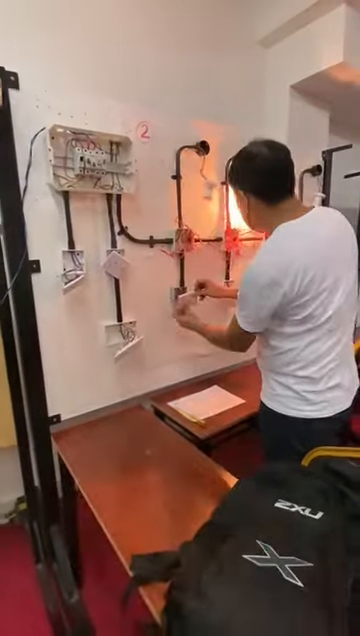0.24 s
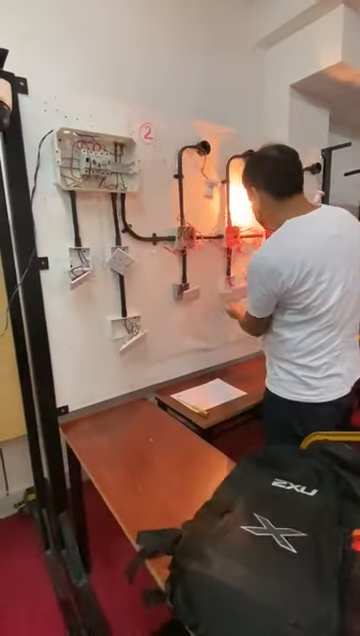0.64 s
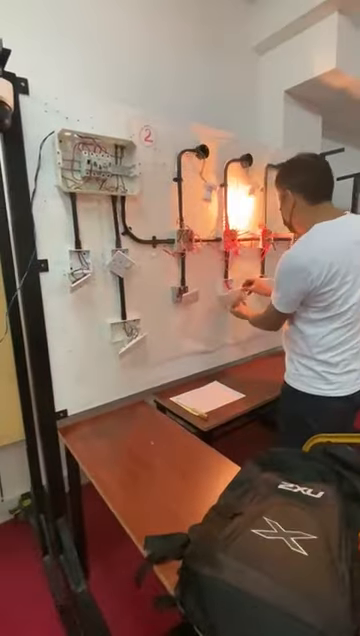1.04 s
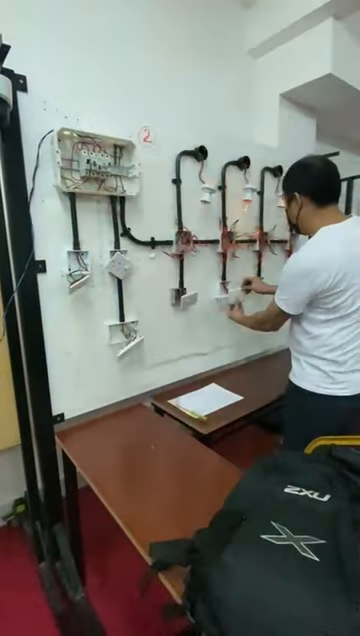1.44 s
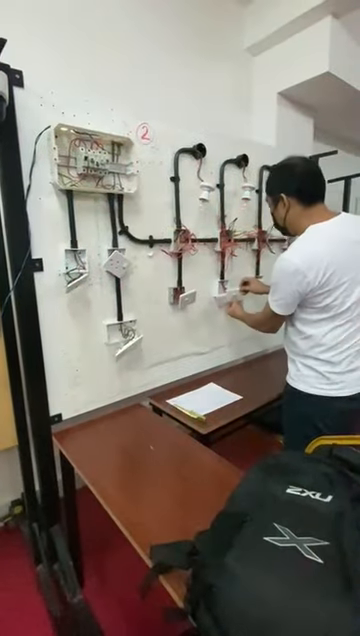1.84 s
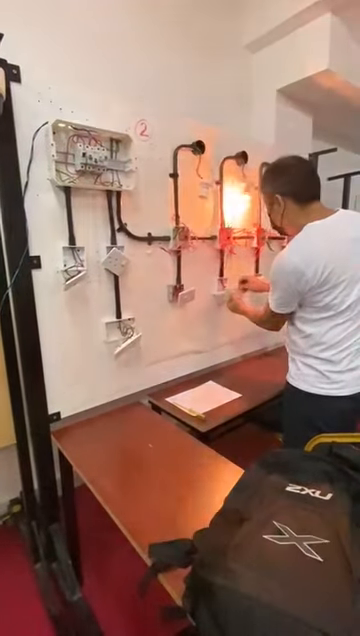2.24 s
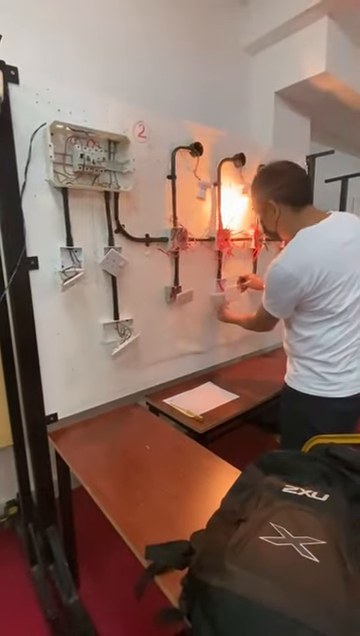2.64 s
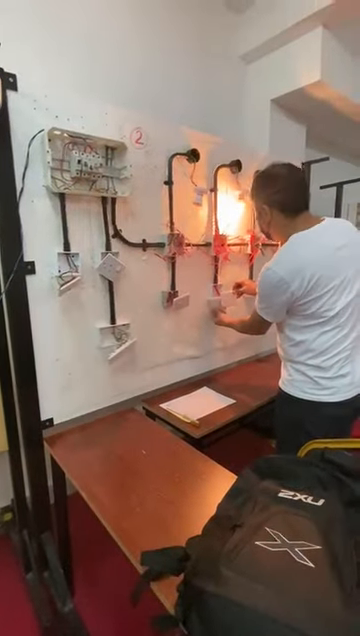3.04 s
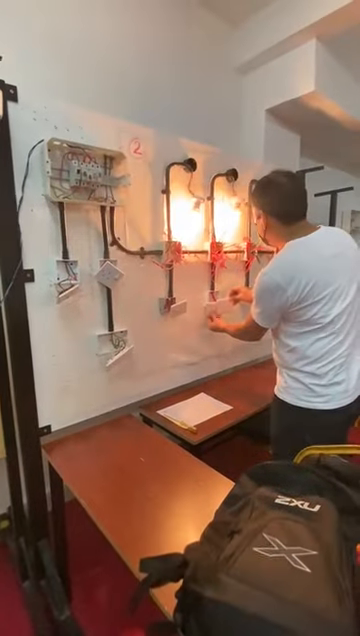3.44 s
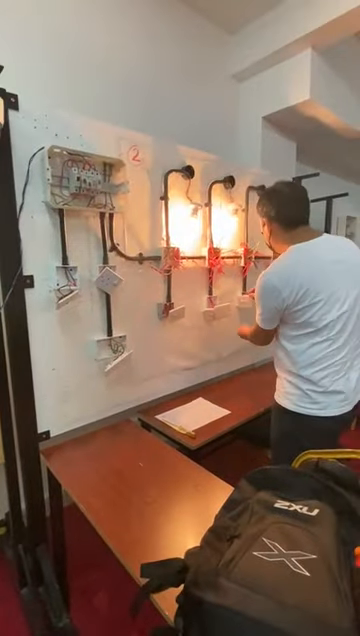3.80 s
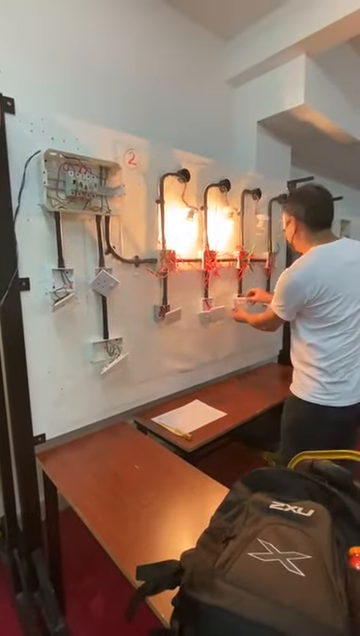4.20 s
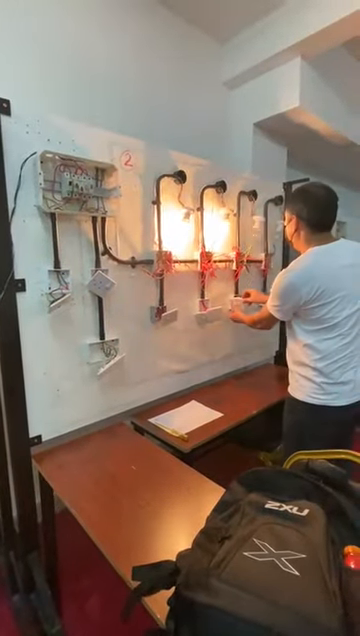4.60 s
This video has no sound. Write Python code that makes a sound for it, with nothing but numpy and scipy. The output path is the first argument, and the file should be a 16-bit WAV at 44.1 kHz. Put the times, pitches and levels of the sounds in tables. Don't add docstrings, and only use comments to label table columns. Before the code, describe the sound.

Four sharp plastic light-switch snaps ring out about a second apart in a hard, echoing room over low ventilation rumble.

```python
import sys
import numpy as np
from scipy import signal
from scipy.fft import rfft, irfft
from scipy.io import wavfile
from scipy.ndimage import uniform_filter1d

SR = 44100
rng = np.random.default_rng(int(sys.argv[2]) if len(sys.argv) > 2 else 0)


def materialize(psi):
    bounded = np.clip(np.atleast_2d(psi).T, -1, 1)
    quanta = np.round(bounded * 32767).astype(np.int16)
    wavfile.write(sys.argv[1], SR, quanta)


def undo_db(level):
    steps = np.asarray(level, float) / 20
    return 10 ** steps


N = 209817

# start in seconds, peak in dB, room tail in dB rms, chatter length in ms,
# level in dB of the creak before the snap.
SNAPS = [
    (.0003, -6.5, -41, .9, -60),
    (1.2964, -7, -33.5, 1, -17.5),
    (2.2294, -5, -34, 1.0, -27.5),
    (3.1643, -7.5, -39, .85, -36),
]
# pitch in Hz, width in Hz, level in dB.
ROCKERS = [
    [(2820, 600, -11), (5140, 600, -2), (5600, 330, -2.5), (6450, 300, -1.5), (6800, 740, -6.5),
     (9200, 1200, -12.5)],
    [(2780, 270, -5), (5160, 310, -8.5), (5740, 92, -7.5), (6100, 120, -8.5), (8820, 1400, -17.5),
     (10700, 160, -26.5)],
    [(2940, 160, -4.5), (4110, 250, -9), (4850, 660, -14.5), (5860, 120, -6), (6950, 180, -15.5),
     (9420, 270, -17)],
    [(2900, 540, -17), (4530, 130, -13), (5453, 230, -5.5), (6500, 810, -17.5), (8030, 130, -15),
     (9000, 380, -19)],
]
# frequency in Hz, level in dB per Hz.
TAILS = [
    [(710, -37.5), (1200, -14), (2550, -11), (2830, 0), (3080, -5.5), (4840, -9.5), (5730, -4),
     (6600, -3.5), (8190, -17), (10300, -10.5), (11000, -21), (11400, -60.5), (14800, -92.5), (22000, -120)],
    [(710, -45.5), (1200, -21.5), (2150, -17), (2910, 4), (3350, -3), (3710, -26), (4040, -7.5),
     (4660, -10), (5310, -7.5), (7890, -14.5), (8920, -12), (11400, -56.5), (14800, -88.5), (22000, -120)],
    [(710, -30.5), (1200, -9.5), (1900, -24.5), (2200, -7.5), (2700, 1.5), (3140, 3.5), (4480, -8.5),
     (5310, -3.5), (6850, -7.5), (9350, -14), (11100, -31.5), (11400, -87.5), (14800, -113), (22000, -120)],
    [(710, -40.5), (1200, -22), (1490, -25.5), (1850, -12.5), (2830, -5), (3850, -12.5), (4450, 2.5),
     (4790, -2), (5360, -2.5), (9090, -16.5), (10500, -17), (11400, -36.5), (14800, -81), (22000, -120)],
]
# delay in ms, level in dB.
ECHOES = [(1.4, -5), (3.9, -14), (5.6, -12), (7.6, -17), (9.5, -13.5), (12.3, -18.5)]
# frequency in Hz, left over right in dB.
PORTS = [(200, 4.5), (1000, -3), (2000, 0.5), (2700, -14.5), (3200, -20.5), (3600, -3), (4400, -8.5),
         (5200, -6.5), (6200, -8), (7500, -9.5), (8300, 1.5), (11000, 1.5)]
# frequency in Hz, how far the left port is turned ahead of the right one, in radians.
PORT_TURN = [(200, 0), (2000, .8), (3000, 1.5), (4600, 2.4), (5100, 0), (7000, .5), (8000, 1.6),
             (11000, 2.8)]


def snap(mix, row, modes, colour):
    s, db, room_db, chatter_ms, creak_db = row
    lead = 600
    ms = (np.arange(lead + 200) - lead) * 1000 / SR
    chatter = np.exp(-(np.maximum(ms, 0) / chatter_ms) ** 2) * (ms >= 0)
    creak = undo_db(creak_db) * np.exp(np.minimum(ms, 0) / 6.0) * (ms < 0)
    x = np.convolve(rough(chatter + creak), ring(modes, rise_ms=0.011))
    x = signal.sosfilt(signal.butter(3, 1700, "high", fs=SR, output="sos"), x)
    x = undo_db(db) * x / abs(x).max()

    hz = np.fft.rfftfreq(len(x), 1 / SR)
    lean, turn = read(PORTS, hz) / 2, read(PORT_TURN, hz) / 2
    level = undo_db(np.array([lean, -lean]))
    phase = np.exp(1j * np.array([turn, -turn]))
    near = np.zeros((2, len(x) + 800))
    add(near, 0, irfft(rfft(x) * level * phase, len(x)))

    near_db = -4.5
    jitter = rng.uniform(-0.81, 1, (len(ECHOES), 2))
    for (delay_ms, echo_db), (shift, side) in zip(ECHOES, jitter):
        sides = undo_db(3.1 * side * np.array([[1], [-1]]))
        add(near, (delay_ms + 0.29 * shift) / 1000, undo_db(echo_db + near_db) * x * sides)
    add(mix, s - lead / SR, near[:, max(lead - round(s * SR), 0):])
    add(mix, s, undo_db(room_db) * room(colour))


# start in seconds, peak in dB, ring in Hz, brightness in dB, room in dB.
TICKS = [(0.8889, -48, 2940, -5.5, 2), (0.9342, -42.5, 2900, -5.5, 13.5), (1.8305, -38, 3100, -11, 12.5),
         (1.8681, -53, 6670, -7.5, 2), (2.1766, -60, 2280, -13, 27.5), (2.4783, -37, 3090, 1, -7.5),
         (2.6879, -65.5, 2800, 0.5, -9.5), (2.7925, -50, 4530, -18.5, -3), (3.0966, -43.5, 2700, -7, 5.5),
         (3.2431, -35.5, 5400, 9, 12), (3.655, -58, 7000, -6, 9), (4.2368, -63.5, 4110, -4, -23),
         (4.5553, -55.5, 2080, -17.5, 11.5), (4.7197, -62, 2060, -25.5, 5)]


def tick(row, tail):
    s, db, hz, bright_db, room_db = row
    scratch = rough(np.exp(-np.arange(500) / 150.0))
    modes = [(hz, 600, 0), (1300, 500, -8), (5400, 700, bright_db), (8000, 3000, bright_db - 20.5)]
    x = np.convolve(scratch, ring(modes, rise_ms=0.05, size=600))
    plate_lean_db = -13.5
    return s, heard(undo_db(db + 1.0) * x / abs(x).max(), plate_lean_db, room_db, tail)


# start in seconds, peak in dB, upper ring in dB,
# left over right in dB, room in dB.
KNOCKS = [
    [(0.593, -35, -14, 11, 6.5), (0.704, -47.5, -12.5, 1, -2), (3.914, -64, -7, 0, 16),
     (3.957, -46.5, -5.5, 18, 12)],
    [(0.895, -46.5, -16, 5.5, -23), (1.867, -49, -24, 7, 16.5), (1.899, -72, -17, 13, -22.5),
     (2.463, -58, 3, 7, -7.5)],
    [(3.265, -38, -2, 1, 7), (3.534, -42.5, -12, -0.5, 17.5), (3.559, -40.5, 5, -5, 2.5),
     (4.25, -51, -5, 4, -7)],
]
# ring in Hz, upper ring in Hz.
BODIES = [
    (332, 700),
    (185, 1000),
    (189, 870),
]


def knock(row, tail):
    s, db, upper_db, lean_db, room_db, hz, upper_hz = row
    push = np.hanning(30)
    low = [(hz, 110, 0), (1.6 * hz, 160, -4)]
    upper = [(upper_hz, 130, upper_db), (1.4 * upper_hz, 300, upper_db - 3.0)]
    x = np.convolve(push, ring(low + upper, rise_ms=0.91, size=3000))
    return s, heard(undo_db(db + 3.5) * x / abs(x).max(), lean_db, room_db, tail)


# peak in seconds, level in dB, rise and fall in seconds.
SLIDE = [
    (0.91, -61, 0.01, 0.12),
    (.96, -62.5, 0.058, 0.4),
    (1.875, -57.5, .02, 0.24),
    (2.218, -55, .22, .006),
    (3.094, -58.5, 0.015, .07),
    (3.16, -45.5, 0.0026, 0.0023),
]
# frequency in Hz, level in dB per Hz.
PALM = [(290, -33), (500, -7.5), (1050, -4.5), (1440, -32.5), (3040, -8), (4000, -35.5), (5480, -29),
        (7490, -59), (9120, -26), (11400, -76), (14800, -104), (22000, -120)]
# peak in seconds, level in dB, rise and fall in seconds.
RUSTLE = [
    (.9, -56, 0.03, 0.092),
    (.95, -61, 0.029, 0.29),
    (3.6, -65.5, 0.0042, 0.46),
    (3.93, -62, 0.043, 0.49),
    (4.25, -50, 0.083, 0.37),
    (4.56, -69.5, 0.056, 0.06),
]
# frequency in Hz, level in dB per Hz.
CLOTH = [(290, -48), (500, 1.5), (658, -6.5), (1410, -6.5), (1580, -14.5), (2190, -6), (4440, -9),
         (7020, -12.5), (9240, -17), (11400, -55.5), (14800, -88), (22000, -120)]


def rustle(strokes, colour, gain_db):
    t = np.arange(N) / SR
    level = np.zeros(N)
    for s, db, rise, fall in strokes:
        swell = np.interp(t, [s - abs(rise), s, s + abs(fall)], [0, 1, 0])
        level += undo_db(db) * swell ** 2.08
    grain = undo_db(2.0 * evened(uniform_filter1d(rng.standard_normal(N), 300)))
    hiss = pair(N, 256, lambda hz, t: read(colour, hz) + 0 * t)
    return undo_db(gain_db) * hiss * evened(grain) * uniform_filter1d(level, 400)


# start in seconds, pitch in Hz, level in dB, time to fall 60 dB in seconds.
CONDUIT = [
    (0.886, 1130, -54, 0.42),
    (0.938, 1143, -56.5, 0.32),
    (.975, 1138, -63, 0.37),
    (1.83, 5200, -58.5, 0.404),
    (3.564, 824, -44, 0.38),
]


def conduit(mix):
    t = np.arange(SR // 2) / SR
    for s, hz, db, t60 in CONDUIT:
        flutter = 1 + .5 * evened(uniform_filter1d(rng.standard_normal((len(t), 2)).T, size=500))
        fade = undo_db(db - 60 * t / t60) * (1 - np.exp(-t / 0.0022))
        note = np.sin(2 * np.pi * hz * t + np.array([[0], [1.8]]))
        add(mix, s, fade * note * flutter)


# frequency in Hz, level in dB per Hz.
AIR = [(12, -36), (20, -14.5), (48, -1), (101, -3.5), (212, -7), (236, -11), (300, -11), (352, -11),
       (435, -11), (510, -20.5), (552, -18.5), (1070, -24.5), (1640, -33.5), (6520, -49.5), (11400, -74.5),
       (14800, -101), (22000, -120)]
# time in seconds, level in dB.
RUMBLE = [(0.0, -52), (0.33, -56.5), (0.52, -51.5), (1.539, -53.5), (1.849, -54.5), (2.33, -49),
          (3.048, -57), (3.36, -56), (3.7, -48), (3.84, -52), (4.53, -53.5), (4.76, -52.5)]


def air():
    s, db = np.transpose(RUMBLE)

    def wander(hz, t):
        rumble = (np.interp(t, s, db) - db.mean()) / (1 + (hz / 600) ** 2)
        blotches = 7.0 * patches(hz, t) * hz / (hz + 800)
        return read(AIR, hz) + rumble + blotches

    return undo_db(-49.5) * pair(N, 2048, wander)


def patches(hz, t):
    x = uniform_filter1d(rng.standard_normal((len(t), len(hz))), size=8, axis=0)
    return evened(uniform_filter1d(x, size=20, axis=1)).T


# pitch in Hz, width in Hz, level in dB rms.
FAN = [
    (45, 14, -54.5),
    (209.4, 20, -70.5),
    (279.8, 7.2, -64.5),
]


def fan():
    def humps(hz, t):
        power = sum(undo_db(2 * db) / width / (1 + (2 * (hz - f) / width) ** 4) for f, width, db in FAN)
        return 10 * np.log10(power) + 0 * t

    total = np.linalg.norm(undo_db(np.transpose(FAN)[2]))
    return total * pair(N, 16384, humps)


# pitch in Hz, peak level in dB before wavering.
WHINE = [
    (9020, -92),
    (6000, -91),
]


def whine():
    waver_db, waver_s = 3.5, .12
    t, span = np.arange(N) / SR, round(waver_s * SR)
    drift = uniform_filter1d(rng.standard_normal((len(WHINE), N)), span)
    waver = evened(uniform_filter1d(drift, span))
    tones = sum(undo_db(db + waver_db * w) * np.sin(2 * np.pi * hz * t) for (hz, db), w in zip(WHINE, waver))
    return tones * undo_db(np.array([[1.5], [-1.5]]))


def rough(shape):
    x = rng.standard_normal(len(shape)) * shape
    for _ in range(4):
        z = rfft(x, 2048)
        x = irfft(z / (abs(z) + 1e-9), 2048)[:len(shape)]
        x = x * shape / np.sqrt(uniform_filter1d(x ** 2, size=24) + 1e-14)
    return x


def ring(modes, rise_ms, size=2000):
    t = np.arange(size) / SR
    x = np.zeros(size)
    for (hz, width, db), phase in zip(modes, rng.random(8)):
        decay = np.exp(-np.pi * width * t)
        x += undo_db(db) * width * decay * np.sin(2 * np.pi * (hz * t + phase))
    x = x * (1 - np.exp(-t * 1000 / rise_ms)) ** 2
    return x / abs(x).max()


def heard(x, lean_db, room_db, tail):
    wet = undo_db(room_db) * signal.fftconvolve(x[None], tail / np.linalg.norm(tail[0]), axes=1)
    add(wet, 0, x * undo_db(np.array([[lean_db / 2], [-lean_db / 2]])))
    return wet


# frequency in Hz, time to fall 60 dB in seconds.
ROOM_T60 = [(200, 1), (1000, 0.64), (2500, 1.026), (4000, 1.026), (6000, 0.84), (9000, 0.62)]


def room(colour, start_ms=0.9, build_ms=2.0):
    def dying(hz, t):
        return read(colour, hz) - 60 * (t - .09) / np.maximum(read(ROOM_T60, hz), .1)

    ms = np.arange(60000) * 1000 / SR
    tail = pair(60000, 256, dying) * (1 - np.exp(-np.maximum(ms - start_ms, 0) / build_ms))
    return tail / np.sqrt(np.mean(tail[:, :SR // 5] ** 2))


# frequency in Hz, likeness (negative = opposite sign).
DIFFUSE_SAME = [(60, .96), (200, .93), (500, .1), (1100, -.5), (1800, 0), (2900, -.45), (3500, -.4),
                (4000, -.05), (4650, -.55), (5300, .5), (6300, .4), (7300, .75), (8100, .05), (10800, -.8)]
# frequency in Hz, left over right in dB.
DIFFUSE_LEAN = [(60, 2.5), (400, 4.5), (1000, 1), (3000, -1.5), (5500, -1.5), (7000, 0), (9000, 1.5),
                (11000, 0)]


def pair(length, size, shape):
    hop, hz = size // 4, np.fft.rfftfreq(size, 1 / SR)[:, None]
    t = np.arange(length // hop + 5) * hop / SR
    a, b, c, d = rng.standard_normal((len(t), len(hz), 4)).T
    like, lean = read(DIFFUSE_SAME, hz), read(DIFFUSE_LEAN, hz)
    left = a + 1j * b
    right = like * left + np.sqrt(1 - like ** 2) * (c + 1j * d)
    z = np.array([left * undo_db(lean / 2), right * undo_db(-lean / 2)]) * undo_db(shape(hz, t))
    return evened(signal.istft(z, nperseg=size, noverlap=size - hop)[1][:, :length])


def evened(x):
    return x / np.sqrt(np.mean(x ** 2) + 1e-20)


def read(points, hz):
    f, value = np.transpose(points)
    return np.interp(np.log(hz + 1), np.log(f + 1), value)


def add(mix, s, sound):
    part = mix[:, max(round(s * SR), 0):][:, :sound.shape[1]]
    part += sound[:, :part.shape[1]]


# frequency in Hz, level in dB.
ROOM_COLOUR = [(300, 10.5), (1500, 13.5), (2300, 5), (3000, 3), (4300, 4.5), (6000, -24), (8000, -17.5),
               (11000, 14)]


def scene():
    mix = air() + fan() + rustle(RUSTLE, CLOTH, gain_db=0.5) + rustle(SLIDE, PALM, gain_db=6.0)
    conduit(mix)
    for row, modes, colour in zip(SNAPS, ROCKERS, TAILS):
        snap(mix, row, modes, colour)
    tails = [room(ROOM_COLOUR) for _ in range(3)]
    for k, row in enumerate(TICKS):
        add(mix, *tick(row, tails[k % 3]))
    blows = sorted((*blow, *body) for body, hits in zip(BODIES, KNOCKS) for blow in hits)
    for k, row in enumerate(blows):
        add(mix, *knock(row, tails[k % 3]))
    return mix + whine()


# frequency in Hz, level in dB against the other.
STARVED = [(500, -14), (2000, -8), (3300, -5), (4000, -3), (4600, -4), (6000, -4.5), (7500, -4), (8400, -1),
           (9000, -2)]


def starve(x, size, band):
    hz, _, z = signal.stft([x[0] + x[1], x[0] - x[1]], SR, nperseg=size, noverlap=size // 2)
    power = abs(z[:, :-1]) ** 2
    bands = np.add.reduceat(power, np.arange(0, size // 2, band), axis=1)
    bands = bands.repeat(band, 1)[:, :size // 2] + 1e-30
    weak = bands < bands[::-1] * undo_db(2 * read(STARVED, hz[:-1]))[:, None]
    calm = power.sum((0, 1)) < undo_db(2 * -32)
    z[:, :-1] *= 1 - (weak & calm)
    both, apart = signal.istft(z, SR, nperseg=size, noverlap=size // 2)[1][:, :x.shape[1]]
    return np.array([both + apart, both - apart]) / 2


def band_limit(x):
    return signal.sosfilt(signal.butter(12, 11540, fs=SR, output="sos"), x)


def record(dry):
    cut = signal.sosfilt(signal.butter(4, 40, "high", fs=SR, output="sos"), dry)
    cut = np.tanh(cut * .8) / .8
    edge = signal.firwin(255, 11300, window=("kaiser", 9), fs=SR)
    limited = signal.oaconvolve(cut, edge[None], "same")
    mix = starve(limited, 2048, 14)
    return band_limit(mix)


dry = scene()
out = record(dry)
materialize(out)
```